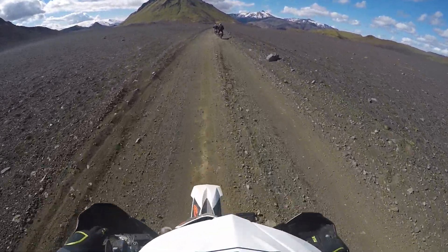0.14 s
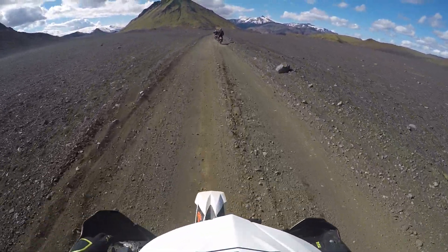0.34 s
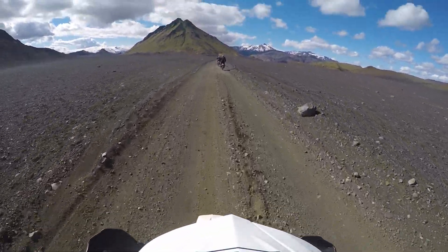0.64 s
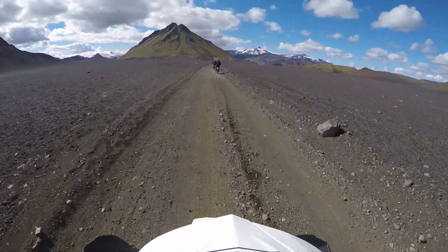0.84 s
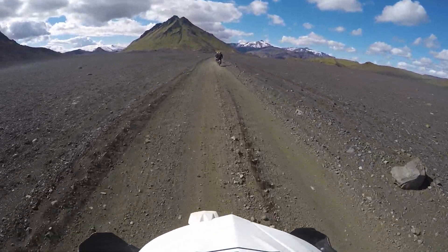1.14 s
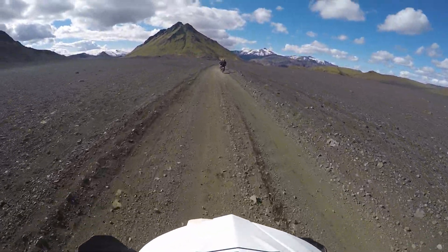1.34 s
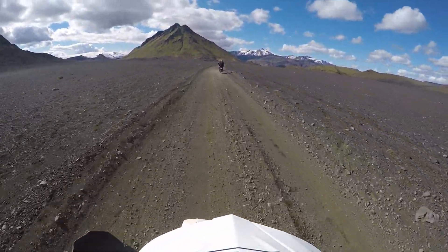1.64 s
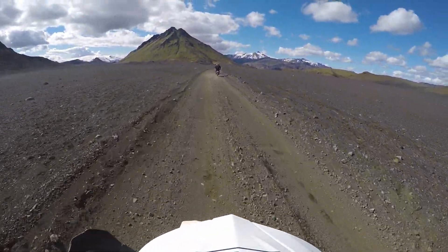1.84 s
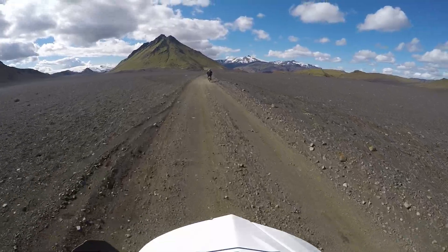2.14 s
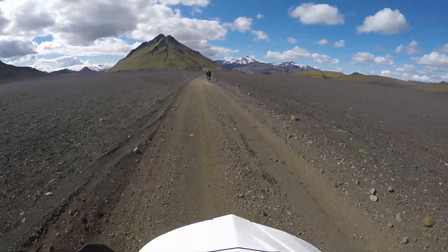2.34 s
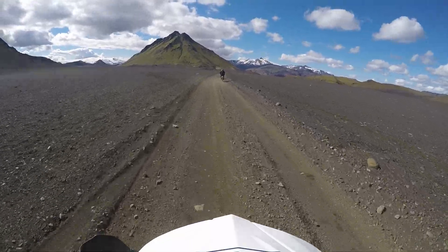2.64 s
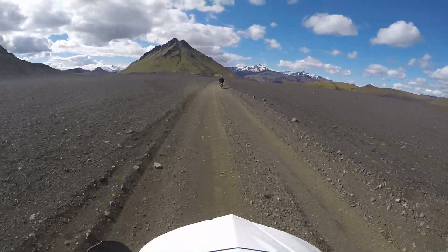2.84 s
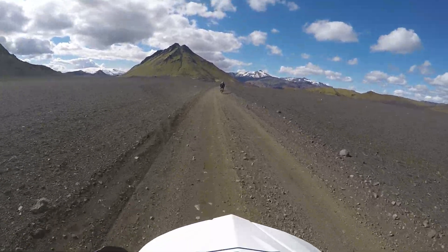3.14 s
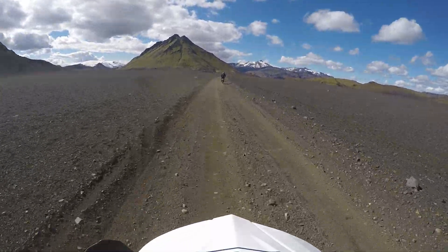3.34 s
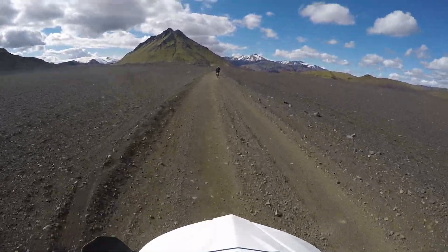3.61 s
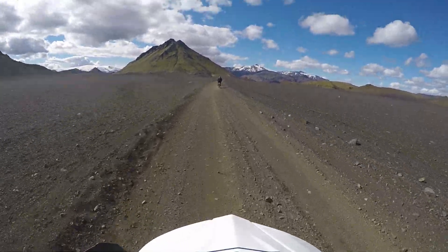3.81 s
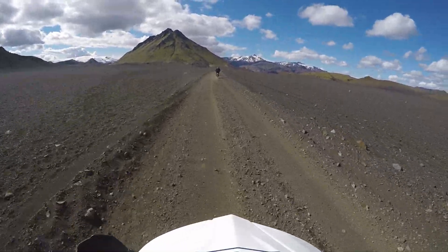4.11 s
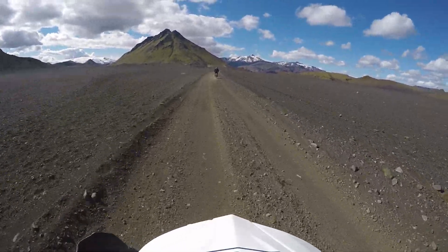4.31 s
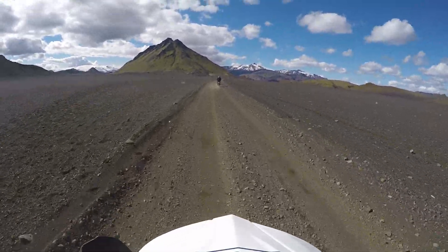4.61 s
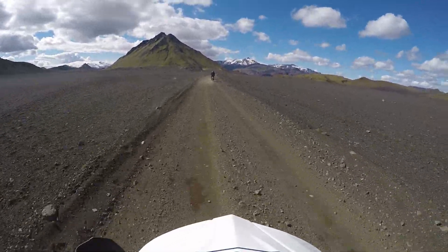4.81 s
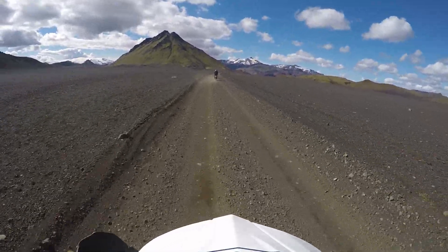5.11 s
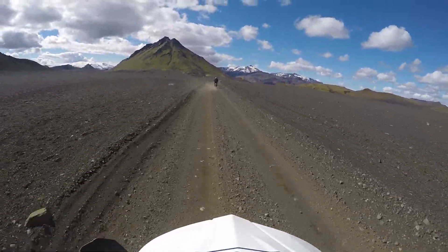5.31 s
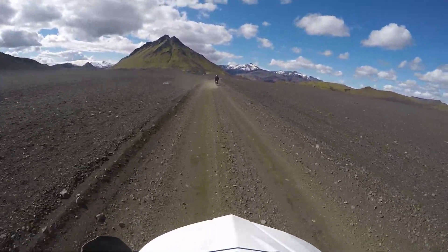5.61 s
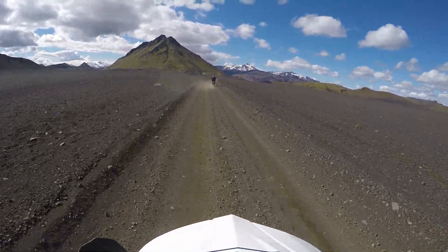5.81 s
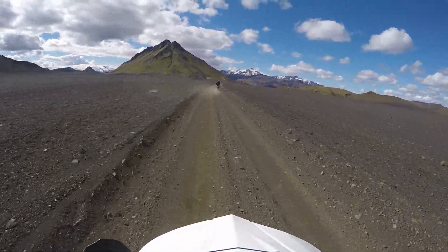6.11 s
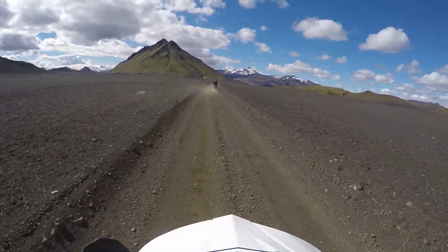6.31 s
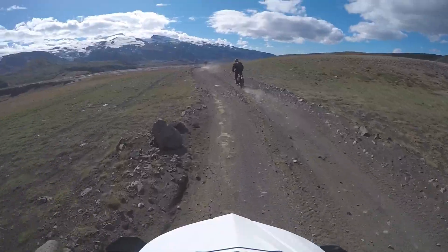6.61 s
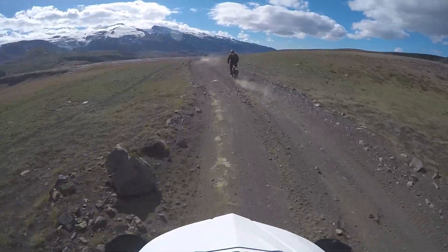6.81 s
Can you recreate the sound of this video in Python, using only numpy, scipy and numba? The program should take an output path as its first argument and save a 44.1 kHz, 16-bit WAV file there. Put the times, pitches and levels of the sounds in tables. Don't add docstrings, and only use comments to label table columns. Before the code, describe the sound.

Heard from a camera microphone on a rider's helmet outdoors, a single-cylinder motorcycle thuds low and accelerates, then changes up once and pulls steadily. Wind begins faint and grows into a strong, bright rush with low buffets and mount rumbles. A stone strikes the housing with a hard, dry click, and everything briefly dips. Near the end, an abrupt cut brings lower revs and different wind.

```python
import sys
import numpy as np
from scipy import signal
from scipy.fft import rfft, irfft, next_fast_len
from scipy.io import wavfile
from scipy.ndimage import uniform_filter1d
from numba import njit

SR = 44100
rng = np.random.default_rng(int(sys.argv[2]) if len(sys.argv) > 2 else 0)


def unload_audio(sound):
    columns = np.transpose(np.atleast_2d(sound))
    steps = np.round(np.clip(columns, -1, 1) * 32767)
    wavfile.write(sys.argv[1], SR, steps.astype(np.int16))


def natural_amplitude(level_db):
    exponent = np.asarray(level_db, float) / 20
    return 10 ** exponent


N = 306495

# frequency in Hz, level in dB per Hz.
RUSH_AHEAD_HZ_DB = [(470, -14.5), (800, -19.5), (1080, -19.5), (1510, -14.5), (1950, -8.5), (2730, -2.5),
                    (3020, 0), (3820, 0.5), (4950, -20.5), (5540, -19), (5970, -25), (6430, -22),
                    (7010, -30.5), (12100, -39.5), (15500, -52)]
# frequency in Hz, level in dB per Hz.
RUSH_TURNED_HZ_DB = [(470, -49), (800, -23.5), (1060, -21.5), (1470, -8.5), (2130, -14), (2440, -3),
                     (3130, -0.5), (4010, -8.5), (4770, -24.5), (10800, -43.5), (12900, -48), (14900, -73),
                     (15500, -90)]
# frequency in Hz, level in dB per Hz.
ROAR_HZ_DB = [(35, -2), (55, 12), (85, 10), (120, 3), (160, 0), (420, -1), (550, -4), (690, -2.5),
              (900, -8), (1200, -15), (1800, -30)]
# frequency in Hz, level in dB per Hz.
BUFFET_HZ_DB = [(5, -29), (12, -2.5), (28, 1), (45, -3.5), (80, -15.5), (120, -20)]
# centre in Hz, width in Hz, gain in dB.
DIPS_HZ_HZ_DB = [(1826, 25, -20), (2737, 134, -4), (3553, 230, -4), (4226, 186, -6.5)]
# time in seconds, level in dB.
AIRFLOW_S_DB = [(0, -40), (.44, -39.5), (.65, -33), (.87, -33.5), (.98, -31), (1.3, -32), (1.45, -30),
                (1.74, -29.5), (1.85, -25.5), (1.97, -29.5), (2.1, -27.5), (2.29, -23), (2.7, -20),
                (3.1, -21.5), (3.46, -22.5), (3.8, -19), (5.7, -18), (6.95, -17.5)]
# centre in seconds, length in seconds, level in dB.
GUSTS_S_S_DB = [(0, 0.28, -27), (1.0, 0.17, -29), (1.904, 0.11, -30.5), (2.19, 0.16, -28.5),
                (2.697, 0.33, -28.5), (3.0, 0.34, -34), (3.8, .2, -28), (4.563, .3, -25.5),
                (5.55, 0.21, -29.5), (6.05, 0.35, -29.5), (6.803, 0.17, -28.5)]
# centre in seconds, length in seconds, level in dB.
BUMPS_S_S_DB = [(0.61, 0.095, -23.5), (.84, 0.055, -37), (1.097, 0.11, -31.5), (1.273, 0.11, -27.5),
                (1.738, 0.074, -28), (2.61, 0.11, -33), (2.9, 0.09, -28.5), (3.042, 0.08, -26.5),
                (3.364, 0.11, -25.5), (3.782, 0.062, -30), (3.978, 0.27, -28.5), (4.74, 0.065, -23),
                (5.61, 0.23, -30), (5.95, 0.27, -24.5), (6.242, 0.055, -25), (6.41, 0.14, -25)]
# frequency in Hz, level in dB, t60 in seconds.
SHELL_HZ_DB_S = [(830, -10, 0.013), (1320, -21, 0.0065), (1500, -1, 0.0088), (1760, 2.5, 0.017),
                 (1878, -5.5, 0.04), (3290, 1, 0.01), (3820, 5.5, 0.0055), (5070, -14, 0.019),
                 (6700, -14, 0.011), (8020, 3.5, 0.0044), (9800, -11, 0.0064), (11240, -1, 0.0034),
                 (13100, -12, 0.0044)]
# frequency in Hz, width in Hz, level in dB.
EXHAUST_HZ_HZ_DB = [(75, 50, -3), (130, 40, -2), (190, 50, -10), (270, 45, -8), (335, 60, -1),
                    (400, 40, -11), (465, 42, 2), (690, 90, -12)]
# time in seconds, rate in Hz.
REVS_S_HZ = [
    (0, 19.96),
    (.6, 23.06),
    (1.5, 27.35),
    (2.75, 34.2),
    (3.02, 27.67),
    (3.16, 24.89),
    (4.7, 29.22),
    (6.41, 32.8),
    (6.42, 25.45),
    (6.95, 27.32),
]
# time in seconds, throttle from 0 to 1.
THROTTLE_S_OPEN = [
    (0, .8),
    (.5, .9),
    (2.2, 1),
    (2.7, 1),
    (2.95, 0),
    (3.3, 0),
    (3.42, .8),
    (6.41, .8),
    (6.42, .1),
    (6.95, .1),
]
# frequency in Hz, level in dB.
MIC_HISS_HZ_DB = [(1000, 3), (8000, -1), (12500, -6.5), (15500, -16)]
# frequency in Hz, level in dB.
TICK_HZ_DB = [(900, -30), (1500, -9), (2700, -5), (3000, 3), (3400, -4), (4000, -5), (5500, -17), (8500, -31),
              (11000, -50)]
# frequency in Hz, strength from 0 to 1.
ECHO_HZ_SHARE = [(3850, 0.05), (5040, 0.46), (6100, 0.99), (6700, 0.4), (7140, 0.016)]

JUMP_S, PULL_ENDS_S = 6.415, 2.7
ROAR_DB, ROAR_PER_RUSH_DB, ROAR_TURNED_DB = -35.5, 0.64, -40.5
BUFFET_FLOOR_DB, MOUNT_FLOOR_DB = -35, -37.5
EDGE_DB, EDGE_DB_PER_S, EDGE_PER_RUSH_DB, EDGE_TURNED_DB = -20.5, 1.2, 0.04, -22
STONE_S, STONE_DB = 4.6885, 1.5
DUCK_S, DUCK_DB, RECOVER_DB_PER_S = 4.675, -7.5, 9
LUG_HZ = 26
CRANK_DB, CRANK_LUG_DB_PER_HZ, CRANK_SHUT_DB = -35.5, 1.6, -10
SECOND_DB, SECOND_LUG_DB_PER_HZ, SECOND_SHUT_DB = -34.5, -1.5, -2
BARK_DB, BARK_LUG_DB_PER_HZ, BARK_SHUT_DB = -36.5, -.5, -11
BARK_DB_PER_HZ = 0.25
ODD_DB = -8.5
HEADER_LEAD_S = .004
INTAKE_DB, INTAKE_DB_PER_HZ = -48.5, 0.62
VALVE_DB, VALVE_HOLD_S, VALVE_FADE_DB_PER_S, VALVE_LOW_DB = -43.5, 0.45, 12, -53


def seconds():
    return np.arange(N) / SR


def curve(points):
    time_s, value = np.transpose(points)
    return np.interp(seconds(), time_s, value)


def at_rms(x, db):
    return x * natural_amplitude(db) / np.sqrt(np.mean(x ** 2))


def walk(rate_hz):
    hold = int(SR / rate_hz)
    steps = np.repeat(rng.standard_normal(N // hold + 1), hold)
    return 1.3 * uniform_filter1d(uniform_filter1d(steps, hold), hold)[:N]


def swells(floor_db, events):
    t = seconds()
    power = natural_amplitude(floor_db) ** 2
    for centre_s, length_s, db in events:
        power = power + natural_amplitude(db) ** 2 * np.exp(-(2 * (t - centre_s) / length_s) ** 2)
    return 10 * np.log10(power)


@njit
def svf(x, hz, width):
    y, band, low = np.empty(len(x)), 0., 0.
    g, k = np.tan(np.pi * hz / SR), width / hz
    for i in range(len(x)):
        v = (band + g * (x[i] - low)) / (1 + g * (g + k))
        band = 2 * v - band
        low = low + 2 * g * v
        y[i] = k * v
    return y


def resonate(x, hz_1, width_1, hz_2, width_2):
    return svf(svf(x, hz_1, width_1), hz_2, width_2)


def spectrum_gain(points, hz, outside_db=None):
    table = np.array(points)
    return natural_amplitude(np.interp(np.log(hz), np.log(table[:, 0]), table[:, 1], left=outside_db, right=outside_db))


def housing(x, points):
    hz = np.maximum(np.arange(N // 2 + 1) * SR / N, 1.)
    return irfft(rfft(x) * spectrum_gain(points, hz), N)


def turbulence(points, shared_db, own_db, rate_hz, echo=0.):
    size = next_fast_len(N)
    hz = np.maximum(np.arange(size // 2 + 1) * SR / size, 1.)
    gain = spectrum_gain(points, hz, -99)
    echo_hz, echo_share = np.transpose(ECHO_HZ_SHARE)
    gain = gain * (1 + echo * np.interp(hz, echo_hz, echo_share) * np.exp(-2j * np.pi * hz / 920))
    gain = gain * natural_amplitude(sum(db * np.exp(-(2 * (hz - f) / w) ** 2) for f, w, db in DIPS_HZ_HZ_DB))
    noise = rfft(rng.standard_normal(size)) * gain
    gust = walk(rate_hz)
    low_hz, high_hz = points[0][0], points[-1][0]
    centres_hz = low_hz * 2 ** np.arange(0, np.log2(high_hz / low_hz) + 1 / 3, 1 / 3)
    bands = []
    for centre_hz in centres_hz:
        mask = np.cos(np.pi / 2 * np.clip(3 * np.log2(hz / centre_hz), -1, 1)) ** 2
        flicker = natural_amplitude(shared_db * gust + own_db * walk(rate_hz))
        bands.append(irfft(noise * mask, size)[:N] * flicker)
    return centres_hz, at_rms(np.array(bands), 0) / np.sqrt(len(centres_hz))


def microphone_hiss():
    return at_rms(housing(rng.standard_normal(N), MIC_HISS_HZ_DB), -60)


def mount_hum():
    hum = resonate(rng.standard_normal(N), 98.3, 22.0, 98.3, 22.0)
    return natural_amplitude(swells(MOUNT_FLOOR_DB, BUMPS_S_S_DB) + 1.0) * at_rms(hum, 0)


def buffeting():
    _, bands = turbulence(BUFFET_HZ_DB, shared_db=-1.5, own_db=2.5, rate_hz=5)
    return natural_amplitude(swells(BUFFET_FLOOR_DB, GUSTS_S_S_DB) + 1.26) * bands.sum(axis=0)


def roar(rush_db, turned):
    roar_db = np.where(turned, ROAR_TURNED_DB, ROAR_DB + ROAR_PER_RUSH_DB * (rush_db + 20))
    _, bands = turbulence(ROAR_HZ_DB, shared_db=-0.1, own_db=1.5, rate_hz=15)
    return natural_amplitude(roar_db + 5.5) * bands.sum(axis=0)


def rush(rush_db, turned):
    ahead_db = EDGE_DB + EDGE_DB_PER_S * seconds() + EDGE_PER_RUSH_DB * (rush_db + 19.5)
    hiss_db = np.where(turned, EDGE_TURNED_DB, ahead_db)
    out = 0
    for points, echo, when, usual_db in ((RUSH_AHEAD_HZ_DB, .6, 1 - turned, -14),
                                         (RUSH_TURNED_HZ_DB, .4, turned, -20)):
        centres_hz, bands = turbulence(points, shared_db=0.08, own_db=0.65, rate_hz=22, echo=echo)
        hiss_share = np.clip(np.log2(centres_hz / 3600) / 0.1, 0, 1)
        air = sum(band * natural_amplitude(share * (hiss_db - usual_db)) for share, band in zip(hiss_share, bands))
        out = out + when * natural_amplitude(rush_db) * air
    return out


def wind():
    rush_db = curve(AIRFLOW_S_DB)
    turned = np.clip((seconds() - JUMP_S) / .004, 0, 1)
    return rush(rush_db, turned) + roar(rush_db, turned) + mount_hum() + buffeting()


def stone():
    t = np.maximum(seconds() - STONE_S, 0)
    ring = 0
    for hz, db, t60_s in SHELL_HZ_DB_S:
        ring = ring + natural_amplitude(db) * np.exp(-np.log(1000) * t / t60_s) * np.sin(2 * np.pi * hz * t)
    push = -natural_amplitude(-13) * np.exp(-t / 0.0099) * np.sin(2 * np.pi * 65 * t)
    return natural_amplitude(STONE_DB) * (ring + push)


def duck():
    since_s = seconds() - DUCK_S
    return natural_amplitude(np.clip(since_s / 0.0068, 0, 1) * np.minimum(DUCK_DB + RECOVER_DB_PER_S * since_s, 0))


def valves(cycles):
    late = cycles + .35
    strength = natural_amplitude(1.1 * rng.standard_normal(N // 100)[late.astype(int)])
    tick = strength * (.06 + np.exp(-(late % 1) / .16)) * rng.standard_normal(N)
    fade_db = VALVE_FADE_DB_PER_S * np.maximum(seconds() - VALVE_HOLD_S, 0)
    return natural_amplitude(np.maximum(VALVE_DB - fade_db, VALVE_LOW_DB)) * at_rms(housing(tick, TICK_HZ_DB), 0)


def intake(cycles):
    draw = 0.42 + np.exp(-((cycles + 0.16) % 1) / 0.18) + 0.51 * np.exp(-((cycles + 0.48) % 1) / 0.2)
    note = resonate(draw * rng.standard_normal(N), 1357.0, 110.0, 1292.0, 140.0)
    gas = (.5 + np.exp(-(cycles % 1) / 0.36)) * rng.standard_normal(N)
    rasp = resonate(gas, 1640.0, 1400.0, 1600.0, 1700.0)
    return at_rms(note, -0.19) + at_rms(rasp, 3.1)


def frame(cycles, crank_db, second_db):
    angle = 2 * np.pi * cycles
    crank = natural_amplitude(crank_db + walk(8)) * np.sin(2 * angle)
    second = natural_amplitude(second_db + walk(8)) * np.sin(4 * angle)
    odd = natural_amplitude(second_db + ODD_DB) * (np.sin(3 * angle) - np.cos(angle))
    return np.sqrt(2) * (crank + second + odd)


def exhaust(cycles):
    whole = cycles.astype(int)
    fired = np.diff(whole, prepend=0) * natural_amplitude(.8 * rng.standard_normal(N // 100)[whole])
    puff = np.exp(-(cycles % 1) / 0.081) * rng.standard_normal(N)
    drive = at_rms(fired, 0) + at_rms(puff, -21)
    bark = 0
    for k, (hz, width_hz, db) in enumerate(EXHAUST_HZ_HZ_DB):
        lead = int(HEADER_LEAD_S * SR) * (hz < 400)
        note = resonate(np.roll(drive, -lead), 1. * hz, 1.5 * width_hz, 1. * hz, 1.5 * width_hz)
        bark = bark + (-1) ** k * at_rms(note, db)
    return at_rms(bark, 0)


def engine():
    hz, throttle = curve(REVS_S_HZ), curve(THROTTLE_S_OPEN)
    pulling = seconds() < PULL_ENDS_S
    cycles = .26 + np.cumsum(hz) / SR
    lug_hz, shut = np.maximum(LUG_HZ - hz, 0) * pulling, 1 - throttle
    crank_db = CRANK_DB + CRANK_LUG_DB_PER_HZ * lug_hz + CRANK_SHUT_DB * shut
    second_db = SECOND_DB + SECOND_LUG_DB_PER_HZ * lug_hz + SECOND_SHUT_DB * shut
    bark_db = BARK_DB + BARK_LUG_DB_PER_HZ * lug_hz + BARK_SHUT_DB * shut
    bark_db = bark_db + BARK_DB_PER_HZ * np.maximum(hz - LUG_HZ, 0) * pulling
    intake_db = INTAKE_DB + INTAKE_DB_PER_HZ * (hz - 20) * throttle * pulling
    gas = natural_amplitude(bark_db) * exhaust(cycles) + natural_amplitude(intake_db) * intake(cycles)
    return gas + valves(cycles) + frame(cycles, crank_db, second_db)


def scene():
    steady = microphone_hiss() + wind() + engine()
    return (duck() * steady + stone())[None]


def top_cut(x):
    return signal.sosfilt(signal.butter(12, 16000, fs=SR, output="sos"), x)


def record(dry):
    clipped = np.clip(dry, -.81, .81)
    low_pass = signal.ellip(8, .2, 70, 15250, fs=SR, output="sos")
    return top_cut(signal.sosfilt(low_pass, clipped))


dry = scene()
out = record(dry)
unload_audio(out)
```